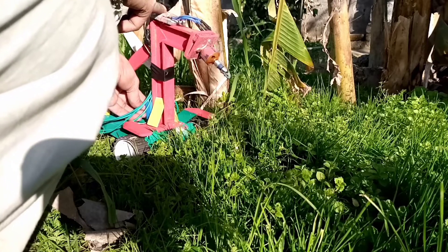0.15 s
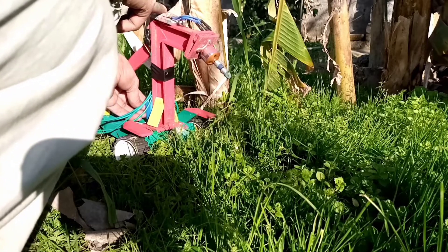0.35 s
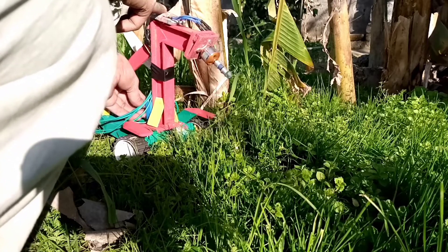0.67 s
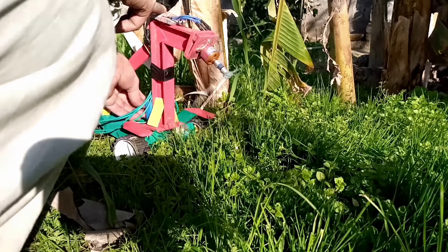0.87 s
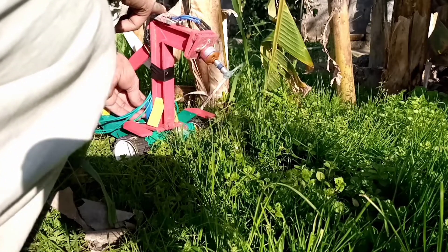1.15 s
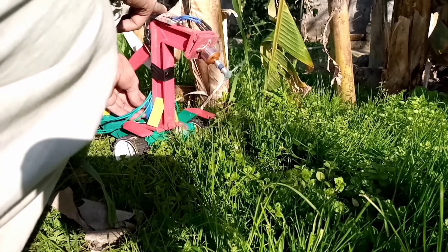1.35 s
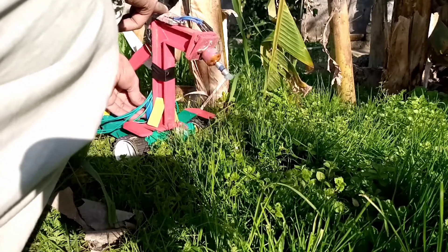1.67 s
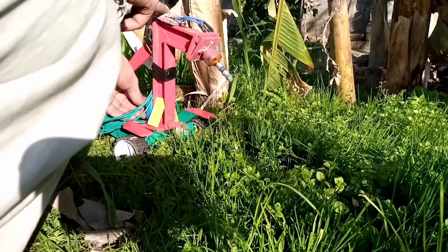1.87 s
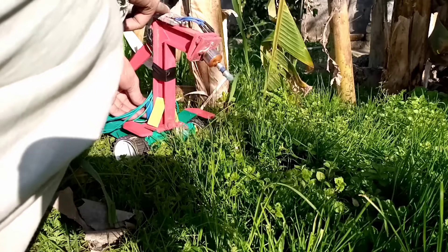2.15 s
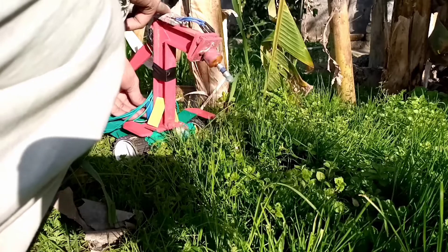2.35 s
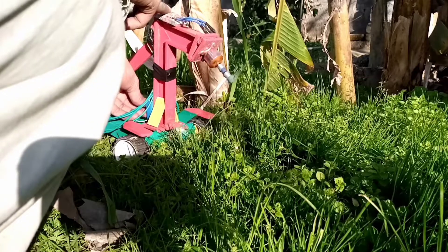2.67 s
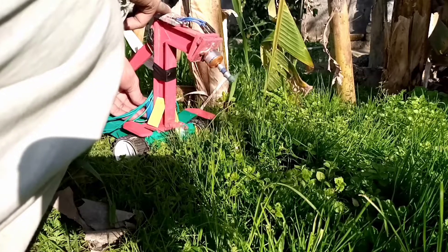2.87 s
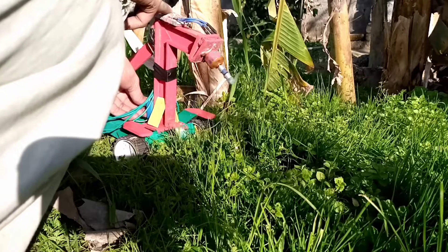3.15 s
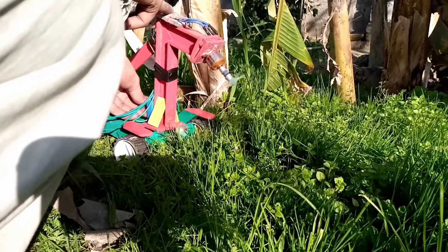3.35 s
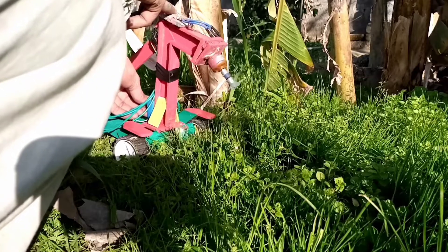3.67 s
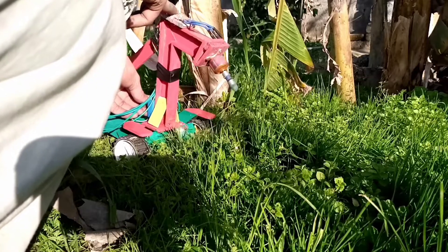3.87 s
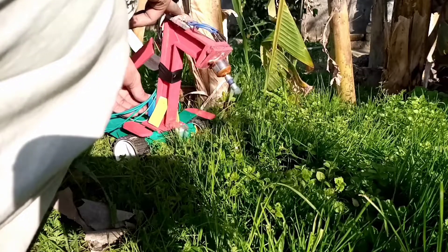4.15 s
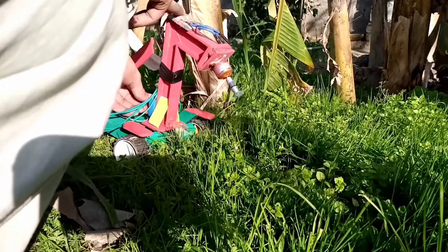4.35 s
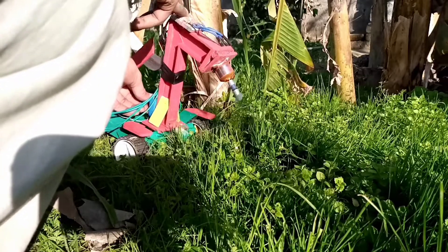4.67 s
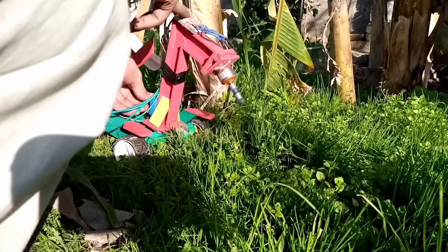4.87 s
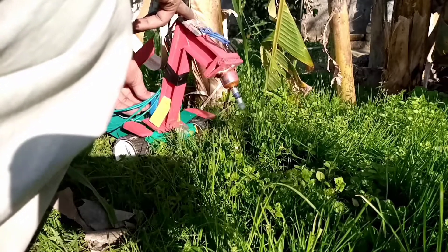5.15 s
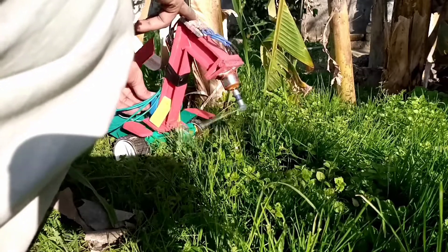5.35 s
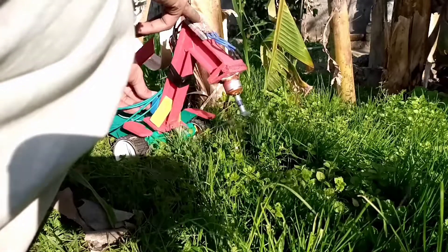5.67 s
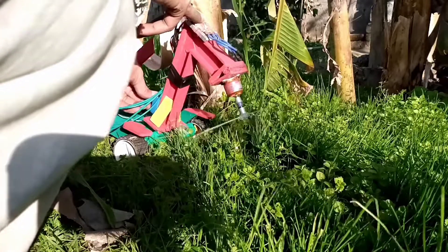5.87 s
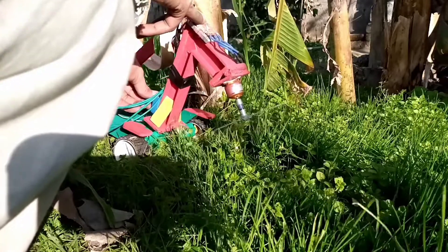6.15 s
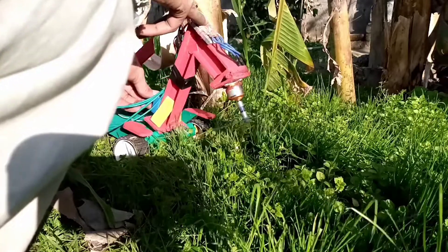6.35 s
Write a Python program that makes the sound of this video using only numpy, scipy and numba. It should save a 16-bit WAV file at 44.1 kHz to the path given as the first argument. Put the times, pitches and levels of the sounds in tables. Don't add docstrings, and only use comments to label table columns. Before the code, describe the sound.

Close by in a quiet garden, a small brushless motor clicks and jerks, then whirls a line into a hissing whistle. The pitch steps up about one second in, then again after two, and holds fast and shrill. Around five and a half seconds it cuts grass, turning rougher, with soft thumps of air, small knocks and short dips. It is still running at the end; left channel silent.

```python
import sys
import numpy as np
from scipy import signal
from scipy.fft import rfft, irfft
from scipy.io import wavfile
from scipy.ndimage import uniform_filter1d
from numba import njit

SR = 44100
rng = np.random.default_rng(int(sys.argv[2]) if len(sys.argv) > 2 else 0)


def generate_wav(sig):
    pcm = np.round(np.clip(np.atleast_2d(sig).T, -1, 1) * 32767).astype(np.int16)
    wavfile.write(sys.argv[1], SR, pcm)


def gain_from_db(level_db):
    decades = np.asarray(level_db, float) / 20
    return 10 ** decades


N = 287091
T = np.arange(N) / SR
FULL_HZ = 117


def columns(table):
    s, *rest = np.transpose(table)
    return [np.interp(T, s, c) for c in rest]


def unit(x):
    return x / np.sqrt(np.mean(x ** 2))


def noise():
    return rng.standard_normal(N)


def tone(turns):
    return np.sqrt(2) * np.sin(2 * np.pi * (turns + rng.random()))


def walk(rate_hz):
    k = int(SR / rate_hz)
    held = np.repeat(rng.standard_normal(N // k + 1), k)
    return unit(uniform_filter1d(uniform_filter1d(held, k), k)[:N])


def swell(s, length_s):
    return np.exp(-((T - s) / length_s) ** 2)


def bumps(events):
    return sum(gain_from_db(db) * swell(s, length_s) for s, db, length_s in events)


def coloured(x, shape, lo_hz=0., hi_hz=SR):
    hz = np.arange(N // 2 + 1) * SR / N + 1
    shape_hz, shape_db = np.transpose(shape)
    spec = rfft(x) * gain_from_db(np.interp(np.log(hz), np.log(shape_hz), shape_db))
    inside = irfft(spec * ((hz > lo_hz) & (hz < hi_hz)), N)
    return irfft(spec, N) / np.sqrt(np.mean(inside ** 2))


@njit
def svf(x, hz, width):
    y, b, l = np.empty(len(x)), 0., 0.
    for i in range(len(x)):
        g, k = np.tan(np.pi * hz[i] / SR), width[i] / hz[i]
        v = (b + g * (x[i] - l)) / (1 + g * (g + k))
        b, l, y[i] = 2 * v - b, l + 2 * g * v, k * v
    return y


def svf_twice(x, hz, width):
    return svf(svf(x, hz, width), hz, width)


def band(x, hz, width_hz):
    return svf(x, np.full(N, 1. * hz), np.full(N, 1. * width_hz))


# time in seconds, shaft rate asked for in Hz.
THROTTLE_HZ = [(0, 1), (.1, 8), (.14, 17), (.23, 56), (.5, 57), (.95, 59.8), (1.14, 73.5), (2.11, 73.8),
               (2.42, 113), (2.55, 116.8), (5.2, 116.7), (5.6, 117.7), (6.5, 119.9)]


def rotor(load):
    lag_s = .1
    follow = 1 / (lag_s * SR)
    asked_hz = columns(THROTTLE_HZ)[0]
    shaft_hz = signal.lfilter([follow], [1, follow - 1], asked_hz)
    return asked_hz, shaft_hz * (1 + (0.0004 + 0.0019 * load) * walk(15))


def whistle(shaft_hz, gate, load, push_hz):
    fast = np.clip(shaft_hz / 90, 0, 1) ** 2
    lag_per_hz, spread_per_hz = .004, .05
    drag = 1 + 0.015 * load - lag_per_hz * push_hz * fast
    hz = np.clip(6450 * (shaft_hz / 117) ** 1.04 * (1 + 0.0034 * walk(5.9)) * drag, 900, 9000)
    width_hz = hz * (0.21 + 0.14 * (hz / 6400) ** 2) * (1 + spread_per_hz * push_hz * fast)
    tip = svf_twice(noise(), hz, width_hz) / np.sqrt(width_hz / 1900)
    inner = svf_twice(noise(), 0.83 * hz, 0.44 * hz) / np.sqrt(hz / 6400)
    both = tip + gain_from_db(-11 + 0.067 * push_hz - 6.1 * (1 - hz / 6400)) * inner
    both = both + 0.24 * band(both, 4130, 690)
    shaded = signal.sosfilt(signal.butter(6, 7500, fs=SR, output="sos"), both)
    return unit(shaded) * gate


# time in seconds, level change in dB, length in seconds.
SNAGS = [
    (5.9, -0.5, .05),
    (6.12, -4.5, 0.023),
    (6.35, -2.5, .05),
    (6.51, -2, 0.055),
]


def line_gate(turns, load):
    p = 4 * np.pi * turns
    passes = 1 + 0.2 * np.cos(p) + 0.072 * np.cos(2 * p + 0.57)
    passes = passes + 0.13 * np.cos(3 * p + 2.7) + 0.17 * np.cos(4 * p + 3.8)
    uneven_db = 0.11 * np.cos(2 * np.pi * turns) + 0.72 * walk(300)
    uneven_db = uneven_db + (0.3 + 0.22 * load) * walk(40) + 0.31 * walk(8)
    snag_db = sum(db * swell(s, length_s) for s, db, length_s in SNAGS)
    return unit(passes * gain_from_db(uneven_db)) * gain_from_db(snag_db)


# frequency in Hz, density in dB per Hz.
HISS_SHAPE = [(3000, -22), (6000, 19.5), (8300, 7), (10000, 8), (12000, 1.5), (13900, 3.5), (14600, 14),
              (15600, 13.5)]
RUMBLE_SHAPE = [(30, -3), (70, -13), (150, 6.5), (300, 5.5), (600, 4.5), (1100, 3), (2000, 8.5),
                (3500, 12.5), (7000, 3), (12000, -40)]


def wake(gate, hiss_db, rumble_db):
    hiss = (gain_from_db(hiss_db) + gain_from_db(-76.5)) * coloured(gate * noise(), HISS_SHAPE, 10230, 13850)
    return hiss + gain_from_db(rumble_db) * coloured(gate * noise(), RUMBLE_SHAPE, 550, 1720)


# multiple in shaft turns, free level in dB, gain in grass in dB.
SHAFT_TONES = [(1, -12.5, -4.5), (2, 0, 0.5), (3, -25.5, 13), (4, -15, 0.5), (5, -30.5, 12.5),
               (5.7, -22, -3), (6, -22.5, 1.5), (7.55, -25.5, -5), (8, -24.5, 4), (10, -22, -8),
               (11, -34, 18), (12, -37, 19), (13, -38, 22.5), (14, -17, -31)]


def beat(turns, pass_db, load):
    flutter = .03 * walk(30)
    out = 0
    for k, db, grass_db in SHAFT_TONES:
        level_db = pass_db + db + load * grass_db + (0.47 + 0.087 * k) * walk(20)
        out = out + gain_from_db(level_db) * tone(k * turns + max(k - 3, 0) * flutter)
    return out


def slaps(turns, load):
    k = np.arange(19, 62)
    db = -57 + 11 * np.clip((k - 19) / 30, 0, 1) + 1.5 * rng.standard_normal(len(k)) + 2.5 * (k % 2 == 0)
    return load ** 2 * sum(gain_from_db(d + 3.9 * walk(12)) * tone(n * turns) for n, d in zip(k, db))


# time in seconds, level in dB.
CHOPPER_LEVEL = [(0, -51), (.06, -50), (.16, -43), (.4, -71), (.55, -51), (.82, -50), (.95, -68),
                 (1.35, -48), (1.7, -51), (1.95, -43), (2.35, -35.5), (4.35, -35), (4.6, -57), (5.0, -30),
                 (5.2, -29), (6.5, -28)]
# shaft rate in Hz, upper side, lower side and slot levels in dB.
MOTOR_LEVELS = [(0, -73, -63, -95), (3, -63, -52, -95), (20, -47, -62, -104), (37, -50, -49, -77),
                (42.7, -46.5, -50.5, -59), (56.4, -53, -57, -53), (58, -52, -58, -62),
                (63.5, -46, -54, -49), (71.3, -40, -47, -52), (74.2, -43.5, -45, -51), (82, -45, -44, -57),
                (92, -43, -46, -62), (110, -41, -45, -62), (121, -39, -39, -55)]
UP_TURNS = (14, 21, 28, 35, 42, 56, 10)
LOW_TURNS = (14, 21, 28, 35, 42, 49, 10, 63)
UP_SIDE_DB = [0, -17, -22, -27, -29, -31, -18]
LOW_SIDE_DB = [0, -12, -12, -10, -7, -16, -19, -12]
TWICE_SIDE_DB = [-11.5, -26]
SLOT_TURNS = (36.7, 35.3, 63, 70, 84, 14, 74, 77)
SLOT_TONE_DB = [2, 0, -2, 3, -5, -17, -8, -3]


def drive(turns, shaft_hz, load):
    chop_hz = 7936.5 - 1.0 * T ** 2
    chop = np.cumsum(chop_hz) / SR
    at_hz, *levels = np.transpose(MOTOR_LEVELS)
    up_db, low_db, slot_db = (np.interp(shaft_hz, at_hz, db) for db in levels)
    up_db = up_db - 6.5 * load
    low_db = low_db + 6.5 * load + 1.4 * walk(6) * (shaft_hz / FULL_HZ) ** 3
    fade_db = -8 * np.clip((shaft_hz - 75) / 40, 0, 1)
    fast = np.clip((shaft_hz - 60) / 8, 0, 1)
    outer_db = fade_db + 6 * (1 - fast) * np.clip((shaft_hz - 40) / 12, -1, 1)

    out = gain_from_db(columns(CHOPPER_LEVEL)[0] + 0.72 * walk(25) + 0.37 * walk(6.24)) * tone(chop)
    for k, db in zip(UP_TURNS, UP_SIDE_DB):
        out += gain_from_db(up_db + db + fade_db * (k > 14) + 0.76 * walk(25.25)) * tone(chop + k * turns)
    for k, db in zip(LOW_TURNS, LOW_SIDE_DB):
        hz = chop_hz - k * shaft_hz
        bell_db = 9 / (1 + ((hz - 5370) / 130) ** 2)
        bell_db = bell_db + 7 * (T < .48) / (1 + ((hz - 5850) / 200) ** 2)
        bell_db = bell_db - 30 * np.clip((4300 - hz) / 700, 0, 1)
        side_db = low_db + db + bell_db + outer_db * (k > 21) + 3.5 * load * (k == 21)
        out += gain_from_db(side_db + (1.1 + .05 * k) * walk(25)) * tone(chop - k * turns)
    for k, db in zip(LOW_TURNS, TWICE_SIDE_DB):
        out += gain_from_db(up_db + db + fade_db + 1.5 + .8 * walk(25.4)) * tone(2 * chop - k * turns)
    out += gain_from_db(-49 - 9 * ((98 * shaft_hz - 5250) / 250) ** 2) * tone(98 * turns)

    slow_db = 25 * np.clip((71 - shaft_hz) / 6, 0, 1)
    slots = 0
    for k, db in zip(SLOT_TURNS, SLOT_TONE_DB):
        loss_db = (k not in (14, 36.7, 77)) * slow_db + 23 * fast * (k in (36.7, 77))
        slots = slots + gain_from_db(db - loss_db + 3.1 * walk(29.56)) * tone(k * turns)
    return out + gain_from_db(slot_db) * slots


# frequency in Hz, width in Hz, level in dB.
BELL_MODES = [(825, 350, -16), (1980, 230, -5), (2655, 270, -1), (3006, 810, -10), (4595, 530, 0),
              (5370, 340, 5), (5810, 510, 2), (6380, 1040, -6.5), (7300, 460, -6), (8150, 600, -30),
              (15200, 650, -8)]
# time in seconds, peak in dB, 60 dB decay in seconds.
JERKS = [(.002, -47, 0.037), (.042, -48, 0.022), (0.056, -32, 0.014), (0.0646, -26, .016),
         (.0735, -28, 0.022), (0.081, -24.5, 0.043), (0.086, -29, 0.033), (0.091, -27, .02),
         (.1077, -24, 0.029), (0.113, -27, 0.043), (0.117, -27, 0.028), (0.127, -31.5, 0.035),
         (0.1404, -25, 0.048), (0.146, -26.5, 0.067), (0.152, -24, 0.06), (.164, -24, 0.032),
         (0.176, -25.5, .05), (0.187, -37, 0.044), (.197, -31, 0.073), (.207, -33, 0.033),
         (0.222, -33, 0.057), (.236, -34.5, 0.19), (.506, -27, .012), (.5407, -33, 0.0087),
         (.597, -35, .015)]


def bell(running, ring_db):
    rattle, jerks = running * gain_from_db(2.0 * walk(400)), 0
    for s, db, t60_s in JERKS:
        jerks = jerks + gain_from_db(db - 6.5) * (T >= s) * np.exp(-np.log(1000) * np.maximum(T - s, 0) / t60_s)
    grit = noise()
    reach = np.clip((T - .25) / 0.23, .15, 1)
    body = 0
    for hz, width_hz, db in BELL_MODES:
        hit = grit * (jerks + rattle * (reach if hz < 3600 else 1))
        body = body + gain_from_db(db) * band(band(hit, hz, 1.7 * width_hz), hz, 1.7 * width_hz)
    gain = 1 / np.sqrt(sum(gain_from_db(2 * db) * 2.33 * width_hz / SR for _, width_hz, db in BELL_MODES))
    ring = gain_from_db(ring_db + 0.5 + 1.8 * walk(48)) * tone(5174 * T + 0.2 * walk(25))
    return gain * body + ring


# time in seconds, peak in dB, length in seconds.
KNOCKS = [
    (5.65, -45, 0.099),
    (5.94, -38.5, 0.1),
    (6.24, -43.5, 0.074),
    (6.45, -45, .08),
]


def frame_knocks():
    return bumps(KNOCKS) * gain_from_db(2.9 * walk(19)) * unit(band(noise(), 2880, 110))


# frequency in Hz, density in dB per Hz.
BUFFET_SHAPE = [(25, -30), (50, -15), (85, 2), (125, -1), (200, -5), (500, -29), (2000, -50)]
# time in seconds, peak in dB, length in seconds.
GUSTS = [
    (0, -64, .06),
    (1.3, -61, 0.11),
    (1.87, -57, 0.14),
    (4.25, -57, 0.089),
    (5.05, -69, 0.16),
    (5.62, -48, .05),
    (5.81, -39, 0.041),
    (6.13, -54, 0.063),
]
# time in seconds, frequency in Hz, peak in dB, length in seconds.
PUFFS = [
    (5.62, 90, -47, 0.018),
    (5.70, 110, -31, 0.012),
    (5.77, 120, -40, 0.013),
    (5.822, 89.2, -32, 0.019),
    (6.102, 110, -37, 0.027),
    (6.374, 110, -53, .02),
]


def puffs():
    draught_db = 0.5 * np.clip(T - 2.2, -2, .3)
    breeze = gain_from_db(-66 + 3.4 * walk(7.5) + draught_db)
    out = (breeze + bumps(GUSTS)) * coloured(noise(), BUFFET_SHAPE, 35, 160)
    for s, hz, db, length_s in PUFFS:
        thump = 0.46 * tone(hz * T) + 0.5 * unit(band(noise(), hz, 0.75 * hz))
        out += gain_from_db(db) * swell(s, length_s) * thump
    return out


# frequency in Hz, density in dB per Hz.
GARDEN_SHAPE = [(40, -26), (90, 1.5), (200, -9), (400, -12), (1000, -37), (4000, -46), (15000, -60)]


def garden():
    return gain_from_db(-64.5 + 2.6 * walk(2.4)) * coloured(noise(), GARDEN_SHAPE)


# time in seconds, grass load 0-1, lean 0-1.
GRASS = [
    (0, 0.12, 0),
    (2.2, 0.1, 0.16),
    (2.8, 0, 0.26),
    (4.5, 0.13, 0.96),
    (5.3, 0.4, .95),
    (5.6, 0.81, 1),
    (5.9, 0.88, 0.98),
    (6.5, 1, 0.88),
]


def scene():
    load, lean = columns(GRASS)
    asked_hz, shaft_hz = rotor(load)
    turns = np.cumsum(shaft_hz) / SR
    speed_db = 20 * np.log10(np.clip(shaft_hz / FULL_HZ, 1e-3, 1))
    push_hz = np.clip(asked_hz - shaft_hz, 0, 12) * (T > .5)

    def level_db(full_db, db_per_speed_db, grass_db, lean_db):
        return full_db + db_per_speed_db * speed_db + grass_db * load + lean_db * lean

    gate = line_gate(turns, load)
    whistle_db = level_db(-18.5, 4, -0.2, -1.04) + 0.0738 * push_hz
    whistle_db = whistle_db - 0.17 * speed_db * np.maximum(speed_db + 6, -2)
    air = gain_from_db(whistle_db) * whistle(shaft_hz, gate, load, push_hz)
    air = air + wake(gate, level_db(-45.5, 3.5, 3, -2.2), level_db(-50.5, 1.56, 1.7, 0.64))
    spin = np.clip((T - .2) / 0.084, 0, 1)
    taut = np.clip((T - .29) / 0.057, 0, 1)
    line = spin * air + taut * beat(turns, level_db(-40.5, 2.5, 0.2, 4) + 0.47 * walk(5.4), load)

    rattle = gain_from_db(level_db(-33.5, 1.5, -13, -3) + 0.28 * push_hz + .9 * walk(14))
    rattle = (rattle + gain_from_db(-33) * np.exp(-T / 0.24)) * (T > .176)
    motor = drive(turns, shaft_hz, load) + bell(rattle, level_db(-43, 7, -18, 10.5))
    mono = line + slaps(turns, load) + motor + frame_knocks() + puffs() + garden()
    return np.array([0 * mono, 2 * mono])


def roll_off(x):
    return signal.sosfilt(signal.butter(12, 16780, fs=SR, output="sos"), x)


def record(dry):
    top_cut = signal.ellip(16, .3, 80, 15470, fs=SR, output="sos")
    mix = signal.sosfilt(top_cut, np.tanh(0.87 * dry) / 0.93)
    return roll_off(mix)


dry = scene()
out = record(dry)
generate_wav(out)
```